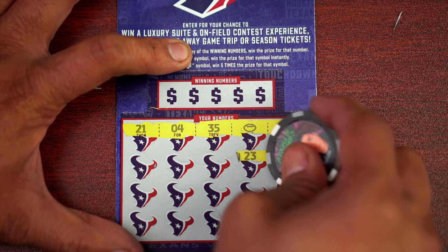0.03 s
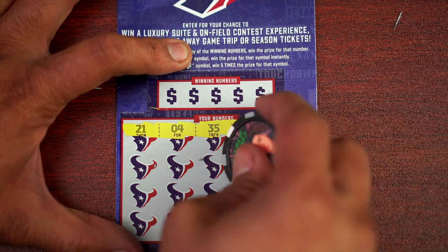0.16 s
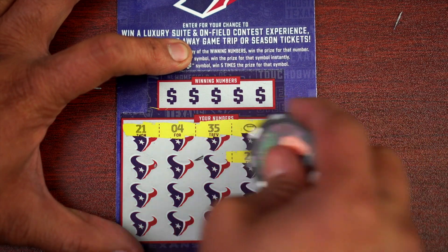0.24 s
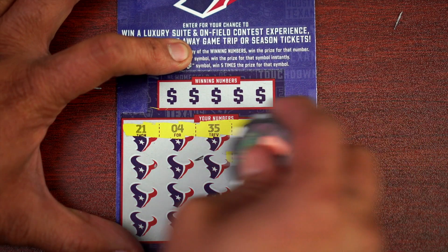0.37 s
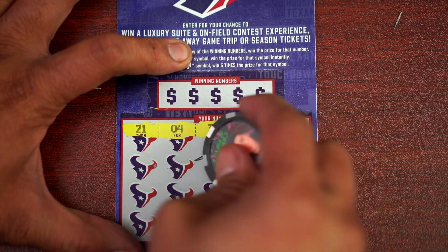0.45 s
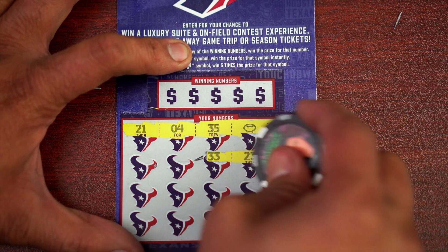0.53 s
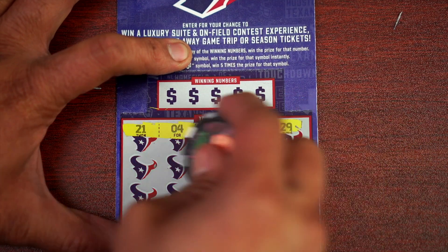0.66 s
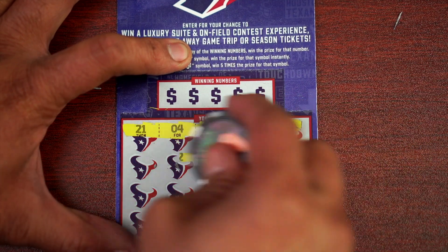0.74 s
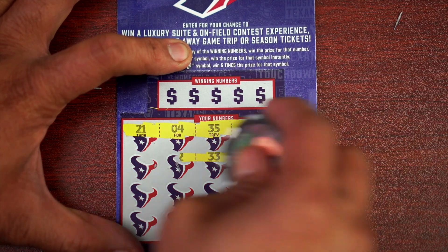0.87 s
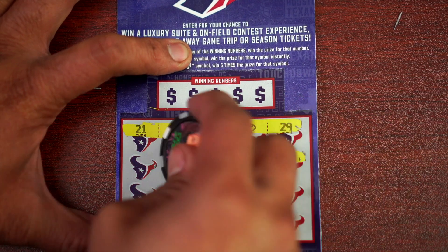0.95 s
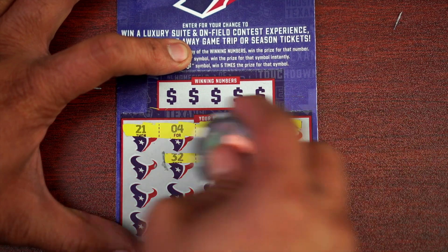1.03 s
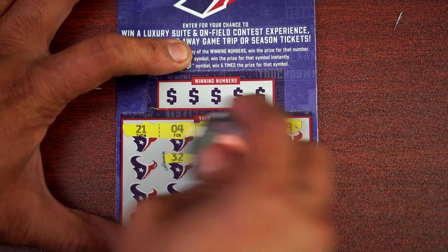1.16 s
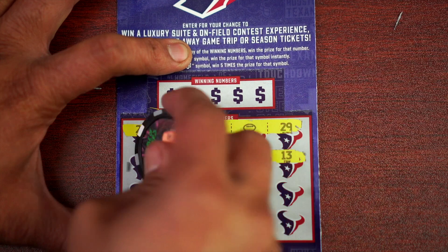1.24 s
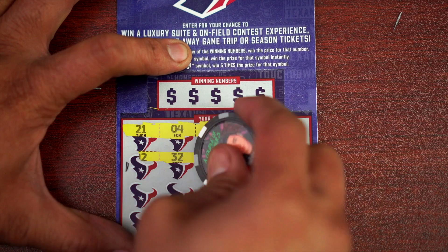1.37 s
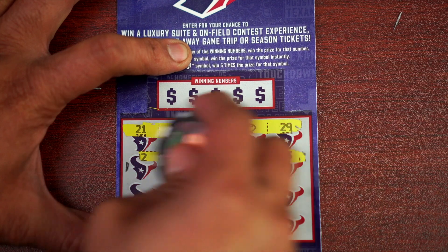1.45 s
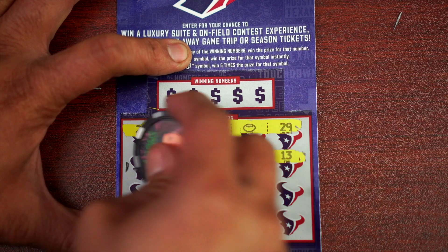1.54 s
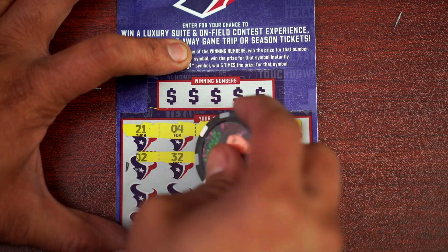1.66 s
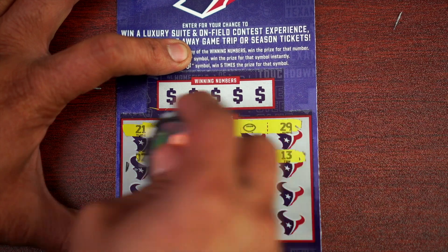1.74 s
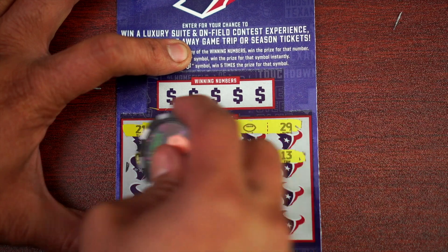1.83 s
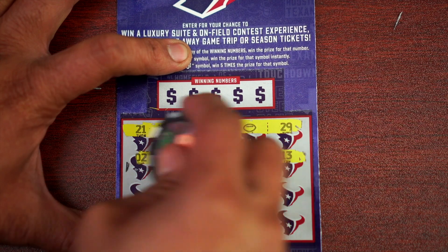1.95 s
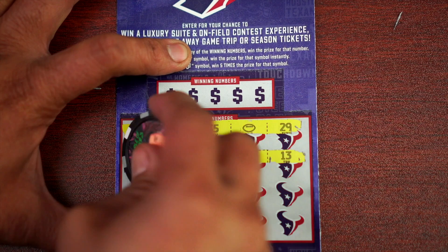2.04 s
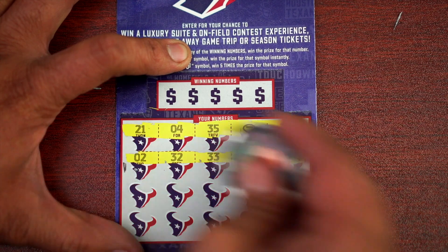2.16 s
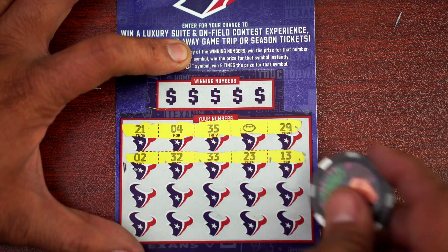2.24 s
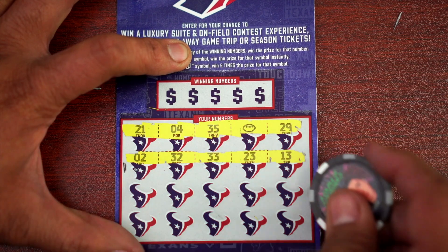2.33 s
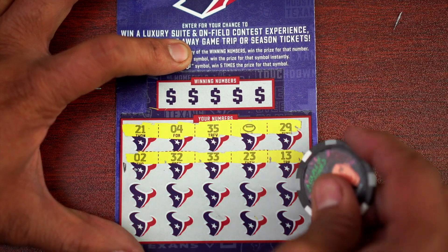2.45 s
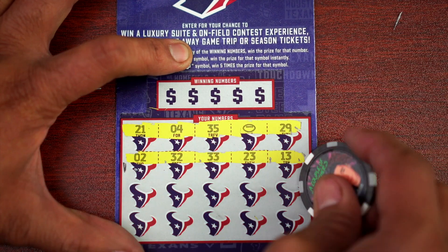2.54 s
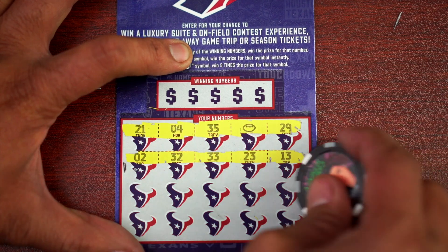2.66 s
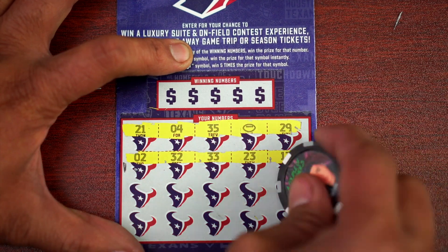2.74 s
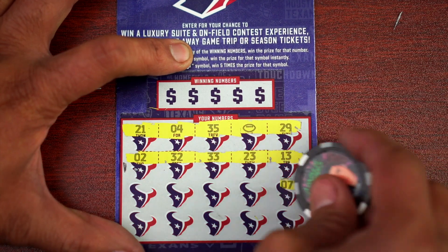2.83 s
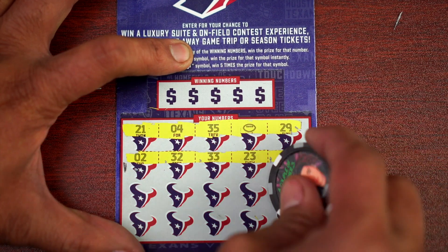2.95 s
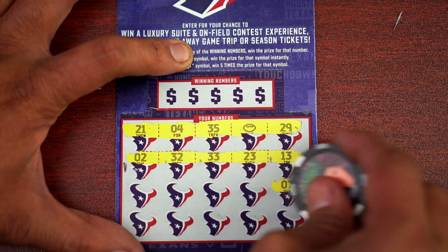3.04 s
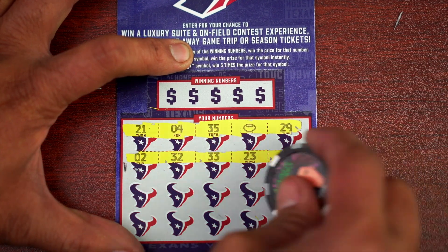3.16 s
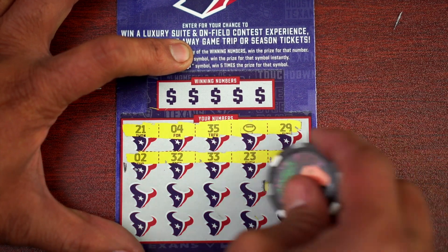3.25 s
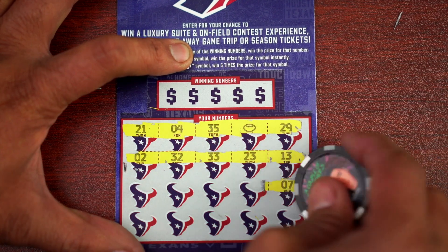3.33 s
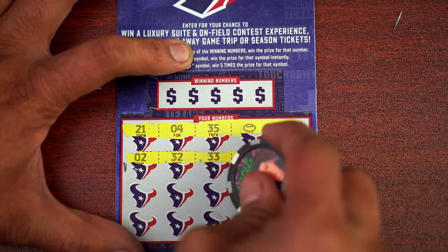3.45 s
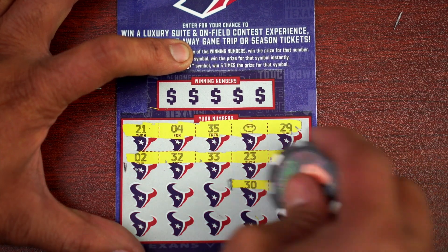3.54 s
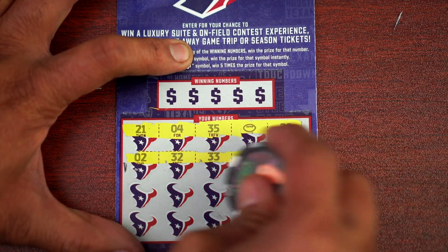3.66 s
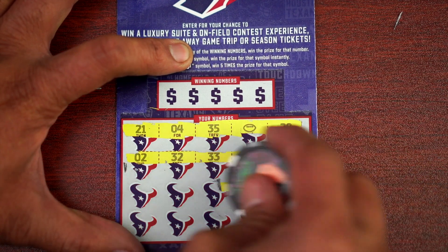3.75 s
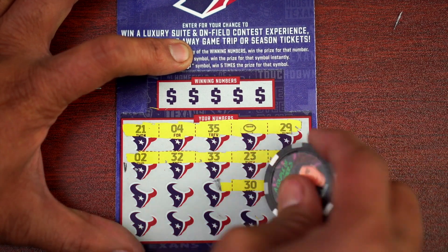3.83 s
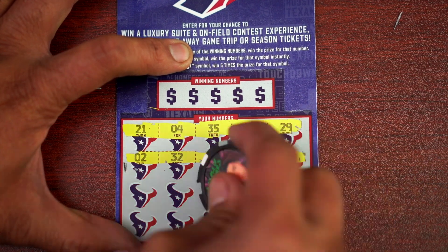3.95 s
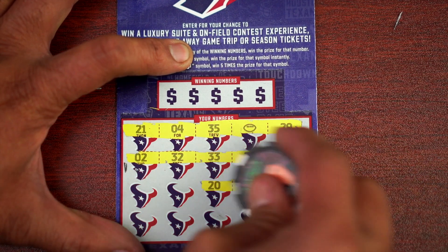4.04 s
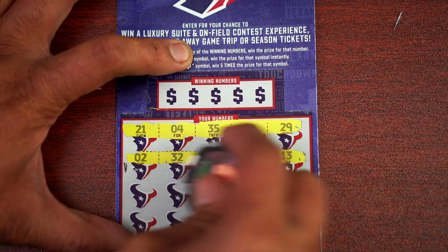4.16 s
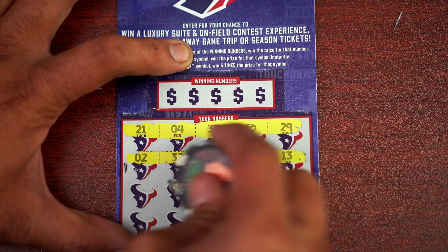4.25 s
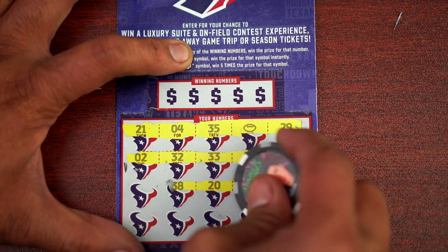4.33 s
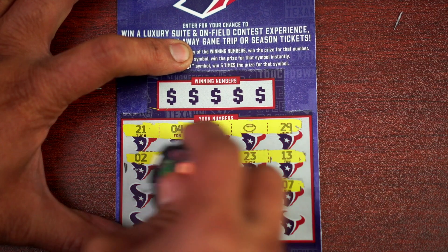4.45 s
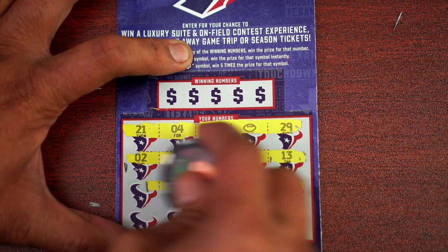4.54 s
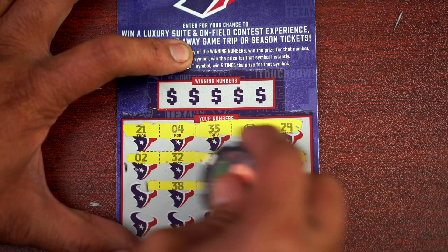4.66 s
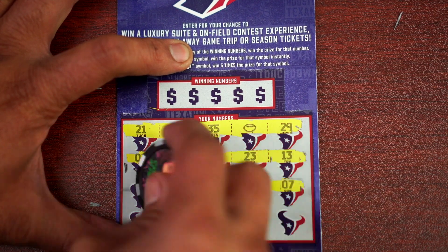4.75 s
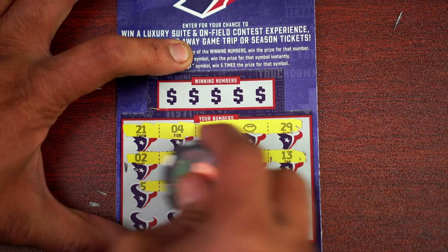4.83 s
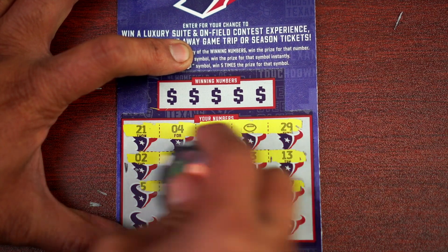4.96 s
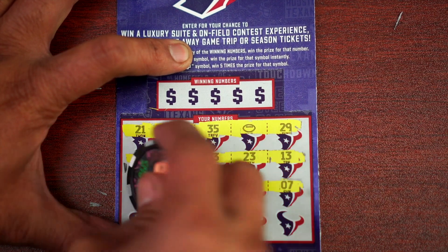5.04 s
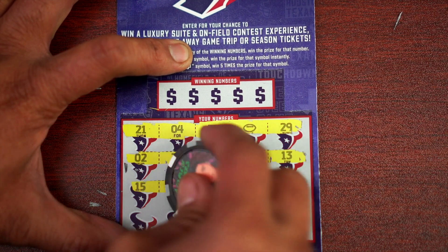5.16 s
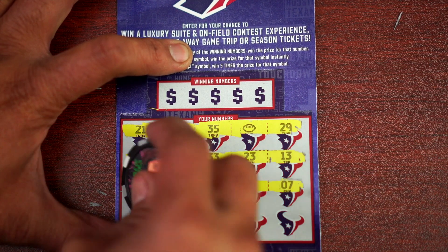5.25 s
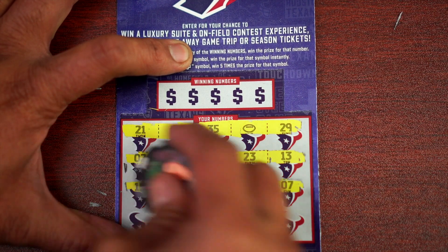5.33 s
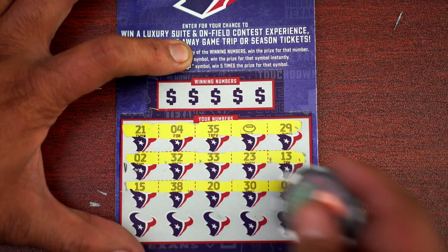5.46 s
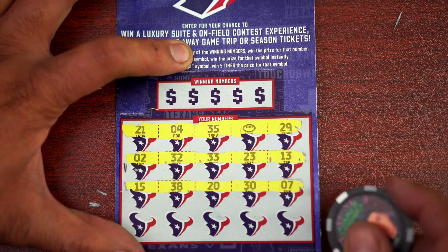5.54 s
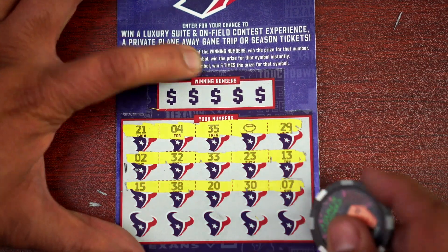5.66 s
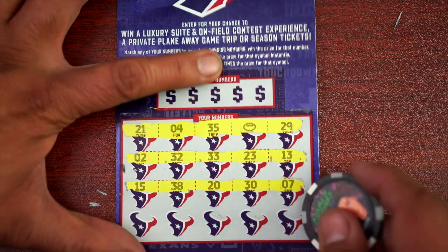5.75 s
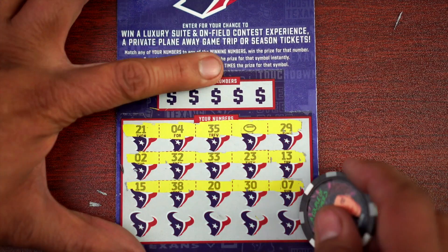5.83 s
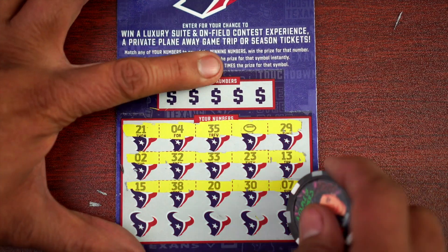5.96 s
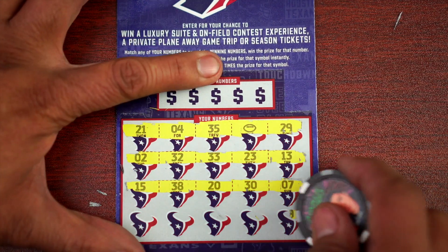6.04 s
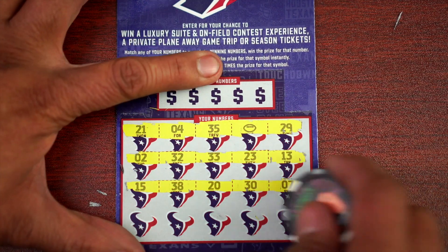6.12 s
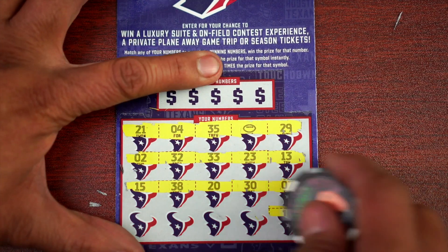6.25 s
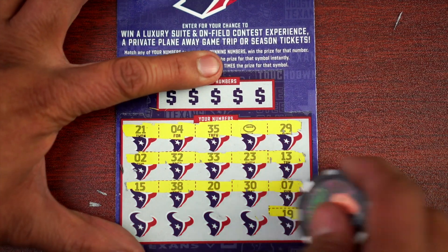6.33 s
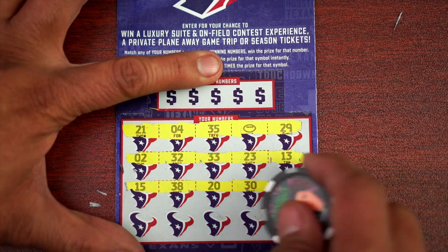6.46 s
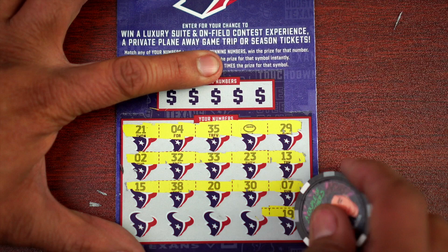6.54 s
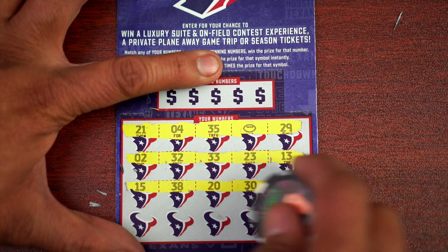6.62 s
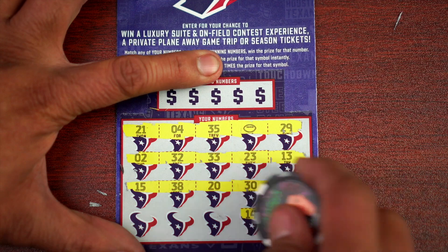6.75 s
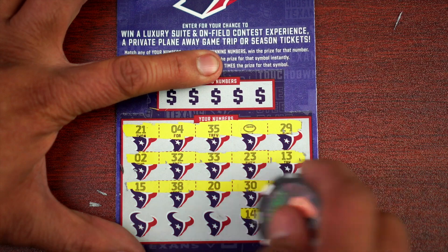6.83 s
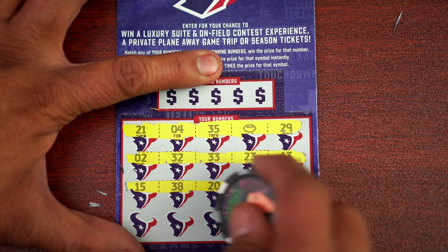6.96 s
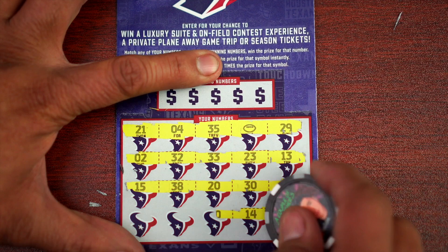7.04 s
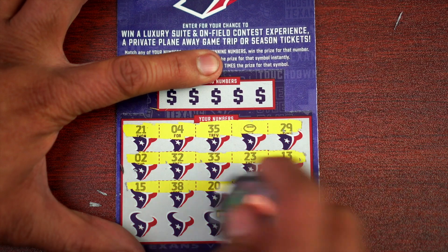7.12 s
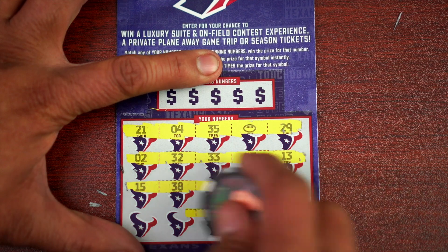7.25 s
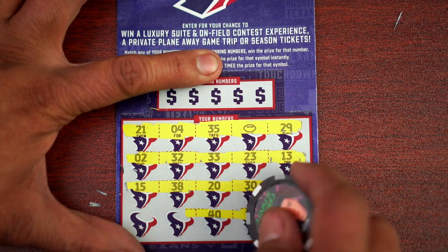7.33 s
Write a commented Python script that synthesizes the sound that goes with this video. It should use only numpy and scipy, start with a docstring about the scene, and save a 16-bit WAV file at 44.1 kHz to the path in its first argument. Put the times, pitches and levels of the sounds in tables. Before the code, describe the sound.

Very close in a small quiet room, a hard plastic disc scratches a coated paper card on a wooden table. Short, separate scrapes come about four a second, each a juddering rub with a dull table knock and gritty rasp. Three runs are divided by two brief rests, where only small ticks, faint rustles and soft skin rubbing remain.

```python
"""A poker chip scratches the latex off a paper lottery ticket on a wooden table, in a small quiet room, close up.
Three rows of ten, eleven and five pushes follow, about four strokes a second, with a short rest after the
first and second. In each push stick-slip jolts judder the chip, drum on the table top and tear off crumbs with
a bright rasp; the way back is a light brush. In the rests chip and holding hand shift with small ticks and
rustles. Skin rubs along the wood and a faint room tone lies underneath throughout."""
import sys
import numpy as np
from scipy import signal
from scipy.fft import rfft, irfft, next_fast_len
from scipy.io import wavfile

SR = 44100
rng = np.random.default_rng(int(sys.argv[2]) if len(sys.argv) > 2 else 0)


def wrap_up_sound(samples):
    """Save the sound to the file named by the first command line argument, as 16-bit audio."""
    columns = np.atleast_2d(samples).T
    # keep every value between -1 and 1, then stretch to whole-number steps
    tamed = np.clip(columns, -1, 1)
    steps = np.round(tamed * 32767).astype(np.int16)
    wavfile.write(sys.argv[1], SR, steps)


N = 325976
TIME = np.arange(N) / SR

# Pushes of the chip, levels ahead of the mix trims: (start [s], length [s], judder [dB],
# edge chatter relative to judder [dB], table drumming [dB], rasp [dB])
PUSHES = [(0.151, 0.066, -46.5, -11.5, -38.5, -65), (0.394, 0.11, -48.5, -10.5, -32.5, -60),
          (0.489, .078, -75.5, -21, -52, -70.5), (0.663, .11, -58.5, 4, -53.5, -53.5),
          (0.922, .12, -45.5, -0.5, -39, -46), (1.189, 0.1, -47, 3.5, -47, -46),
          (1.466, 0.11, -47.5, -28, -45, -62.5), (1.738, 0.13, -46, -24, -37.5, -69.5),
          (1.854, 0.064, -66, -9, -58.5, -67.5), (1.979, 0.15, -70.5, -5.5, -53, -72.5),
          (2.941, 0.092, -74.5, -25, -69.5, -75), (3.16, 0.13, -74, -22, -64.5, -78),
          (3.399, 0.1, -45, -2, -47, -42.5), (3.66, 0.11, -42, -14, -45.5, -49.5),
          (3.91, 0.12, -42, -5, -40.5, -48.5), (4.162, 0.1, -47, -4.5, -37.5, -51),
          (4.421, 0.15, -69, -2, -61, -67.5), (4.718, 0.11, -59, 1.5, -46, -64),
          (4.79, .11, -59.5, -3, -53.5, -71), (4.992, 0.087, -56, -9.5, -49, -67.5),
          (5.239, 0.11, -77.5, -13, -61.5, -79), (6.161, 0.067, -47.5, -17, -40.5, -47.5),
          (6.392, 0.087, -43, -18.5, -46.5, -62), (6.653, 0.066, -67.5, -26, -58.5, -57),
          (6.894, 0.078, -55.5, -17, -56.5, -56.5), (7.156, 0.098, -67.5, -1, -61, -57.5)]
# The edge snags on the coating and slips free: (time [s], level ahead of the rasp trim [dB])
SNAGS = [(0.147, -64), (0.177, -53.5), (0.437, -51.5), (0.449, -59), (1.248, -46), (1.82, -51),
         (2.527, -72), (3.958, -44), (4.776, -73), (4.878, -54.5), (5.778, -80), (5.29, -64.5),
         (6.438, -53)]
# Ticks and rustles as chip and card shift: (time [s], level at the top [dB], pitch [Hz], fall by 20 dB [s])
TICKS = [(0.147, -60, 1780, 0.0027), (2.734, -77.5, 3400, .1), (2.855, -82, 5940, .07),
         (5.458, -79.5, 6540, 0.11), (5.646, -68, 3930, 0.0056), (5.752, -72, 4700, 0.003),
         (5.775, -54, 2600, 0.0042), (5.796, -72.5, 3240, 0.1), (5.884, -73, 456, 0.09)]
# Extra low thumps of the table, mostly on heavy pushes: (time [s], rise and fall by 20 dB [s], level [dB])
THUMPS = [(0.199, 0.054, -36.5), (0.5, 0.051, -38), (1.888, 0.024, -37.5), (4.24, 0.043, -29),
          (4.88, 0.032, -43.5), (5.875, 0.055, -46.5), (6.21, 0.053, -41.5)]
# The hand slides along the table: (time [s], level before its flutter [dB])
HAND_LEVEL = [(0, -70.5), (2.1, -77), (2.3, -95.5), (2.7, -78.5), (3.0, -80.5), (4.7, -73.5), (6.05, -80.5),
              (6.8, -68.5), (7.39, -69.5)]
# The woody answer of the table top varies over time, strongest in the last row:
# (time [s], level relative to drumming [dB])
WOODINESS = [(1.8, -16.5), (3.4, -12), (4.2, -17), (6.3, -8.5)]

# Broad colours, only their shape counts: (frequency [Hz], level per Hz [dB])
# the chip shaking flat on the card
JUDDER_COLOUR = [(200, -10.5), (470, -8.5), (720, -14.5), (850, -15), (930, -6), (1040, -3), (1170, 2),
                 (1300, -2), (1450, -12), (1900, -28.5), (2800, -40)]
# the chip chattering on its tilted edge
EDGE_COLOUR = [(600, -28.5), (1100, -22), (1480, 11), (1800, 4.5), (1980, -6), (2400, -7.5), (2900, -35),
               (4500, -50)]
# the drumming table top
DRUMMING_COLOUR = [(40, -17), (75, 4), (100, 3.5), (145, 0.5), (175, -6), (245, -5), (305, -10.5),
                   (370, -20.5), (700, -27.5), (2500, -86)]
# the woody answer of the table top
WOOD_COLOUR = [(280, -23.5), (430, 0), (600, -5.5), (900, -12.5), (1600, -35.5)]
# the latex tearing off
RASP_COLOUR = [(300, -21.5), (1000, -1), (2200, -7.5), (2900, -7), (3300, -4.5), (3800, 7), (4700, 3),
               (6200, 2.5), (8200, 3), (9600, 0), (12000, -5.5), (14300, -11), (15500, -43)]
# the unloaded chip on the card
BRUSH_COLOUR = [(300, -11.5), (750, -9), (1000, -23), (1400, 5), (1750, -3), (2200, -36), (3300, -10.5),
                (3850, 7), (5500, 0.5), (7500, 2.5), (10000, 0), (15000, -27)]
# skin on wood
HAND_COLOUR = [(30, 2), (110, 7.5), (280, -7), (420, -11.5), (800, -17.5), (1400, -11), (2500, -21.5),
               (6000, -29)]
# the quiet room
ROOM_COLOUR = [(15, 1.5), (34, 1), (55, -1.5), (120, -16), (300, -33), (750, -42.5), (1800, -42.5),
               (2900, -42.5), (4500, -41), (15000, -47)]
# Resonances of the table top with the card on it: (frequency [Hz], width at half lift [Hz], lift [dB])
TABLE_MODES = [(146, 15, 5), (202, 18, 8), (287, 30, 4), (680, 22, 4), (967, 28, 3), (1126, 22, 5),
               (1208, 26, 5), (1321, 24, 4), (1510, 26, 6), (1780, 30, 4), (4720, 120, 4)]

# Timing within a push, as shares of its length; rises, falls and widths reach 20 dB down
PRESS_AT, PRESS_WIDTH = 0.53, 0.47  # hardest pressure
CUT_AT, CUT_RISE, CUT_FALL = 0.52, 0.35, 0.45  # deepest cut into the latex
# Sway of the table: level at mean drumming, and share of the drumming's swing in dB that it follows
SWAY_LAG_S, SWAY_DB, SWAY_FOLLOWS = 0.022, -48, 0.2
# Brush back after a push, if the pause is long enough; level ahead of the mix
RETURN_AFTER_S, RETURN_RISE_S, RETURN_FALL_S, RETURN_DB = 0.051, 0.085, 0.1, -80.5
RETURN_NEEDS_S = 0.11
ROOM_T60_S, ROOM_TONE_DB = 0.46, -64.5
CUTOFF_HZ = 15300


def chip(grip):
    """Coarse slips shake the chip, which breaks loose quickly and glides to a stop; its edge chatters higher."""
    _, _, judder_db, edge_db, *_ = np.array(PUSHES).T
    speed = arcs(judder_db, skew=0.69, taper=1.61, reach=1.12)
    tilted = arcs(judder_db + edge_db, skew=0.82, taper=2.43, reach=1.13)
    judder_force = slips(per_s=1800, spread_db=1.5) * grip * speed
    edge_force = slips(per_s=3000, spread_db=4.0) * grip * tilted
    judder = from_db(0.6) * resonate(judder_force, JUDDER_COLOUR, TABLE_MODES)
    edge = from_db(-0.25) * resonate(edge_force, EDGE_COLOUR, TABLE_MODES)
    return judder + edge


def latex():
    """The coating tears off in thousands of crumbs a second, most in mid-push, with a short crunch at each snag."""
    start, length, *_, rasp_db = np.array(PUSHES).T
    snag_s, snag_db = np.array(SNAGS).T
    cut = swell(start + CUT_AT * length, CUT_RISE * length, CUT_FALL * length, rasp_db)
    uneven_cut = cut * from_db(3.3 * drift(350))
    crunch = swell(snag_s, 0.002, 0.0038, snag_db)
    crumbs = (uneven_cut + crunch) * slips(per_s=16000, spread_db=0.5)
    return from_db(-3.0) * resonate(crumbs, RASP_COLOUR, TABLE_MODES)


def table(grip):
    """Under the hardest pressure the top drums; the whole table sways just after, with some extra low thumps."""
    start, length, _, _, drum_db, _ = np.array(PUSHES).T
    hardest, width = start + PRESS_AT * length, PRESS_WIDTH * length
    force = slips(per_s=1300, spread_db=-1.5) * grip * swell(hardest, width, width, drum_db)
    woody_force = force * from_db(np.interp(TIME, *np.transpose(WOODINESS)))
    drumming = resonate(force, DRUMMING_COLOUR, TABLE_MODES)
    woody = resonate(woody_force, WOOD_COLOUR, TABLE_MODES)

    # a push that drums harder also sways more
    sway_db = SWAY_DB + SWAY_FOLLOWS * (drum_db - drum_db.mean())
    thump_s, thump_width, thump_db = np.array(THUMPS).T
    sway_level = swell(hardest + SWAY_LAG_S, 1.59 * width, 1.83 * width, sway_db)
    sway_level = sway_level + swell(thump_s, thump_width, thump_width, thump_db)
    sway_hz = 34 * (1 + 0.13 * drift(37))
    sway = sway_level * np.sin(2 * np.pi * np.cumsum(sway_hz) / SR)
    return drumming + woody + sway


def brushing():
    """Where a pause leaves it time to come back, the unloaded chip only whispers over the card."""
    start, length, *_ = np.array(PUSHES).T
    end = start + length
    pause = np.append(start[1:], np.inf) - end
    back_s = end[pause > RETURN_NEEDS_S] + RETURN_AFTER_S
    way_back = swell(back_s, RETURN_RISE_S, RETURN_FALL_S, RETURN_DB)
    return resonate(way_back * slips(per_s=5000, spread_db=2.0), BRUSH_COLOUR, TABLE_MODES)


def ticks():
    """The stiff card snaps or rustles: bursts of noise in a band about an octave wide."""
    out = np.zeros(N)
    for time, db, hz, fall in TICKS:
        edges = [hz / np.sqrt(2), min(hz * np.sqrt(2), 0.45 * SR)]
        band = signal.butter(1, edges, "band", fs=SR, output="sos")
        noise = rms_one(signal.sosfilt(band, rng.standard_normal(N)))
        out += noise * swell(time, fall / 10, fall, db)
    return out


def hand():
    """Skin rubs softly along the wood: noise with a fluttering level, coloured by the table."""
    level = from_db(np.interp(TIME, *np.transpose(HAND_LEVEL)) + 2.8 * drift(25))
    return resonate(level * rng.standard_normal(N), HAND_COLOUR, TABLE_MODES)


def reflections(x, t60, treble_loss_hz):
    """Diffuse echoes follow the direct sound and die away by 60 dB in t60 seconds, a little duller."""
    t = TIME[:SR]
    tail = rng.standard_normal(SR) * from_db(-60 * t / t60) * (t > 0.003)
    dull = signal.butter(1, min(treble_loss_hz, 0.45 * SR), fs=SR, output="sos")
    tail = signal.sosfilt(dull, tail)
    return signal.fftconvolve(x, tail / np.sqrt(np.sum(tail ** 2)))[:N]


def room_tone():
    """The quiet room is steady noise, mostly deep bass."""
    return from_db(ROOM_TONE_DB) * resonate(rng.standard_normal(N), ROOM_COLOUR)


def slips(per_s, spread_db):
    """Stick-slip friction: tiny jolts of uneven size and either sign at random moments; rms 1."""
    sizes = from_db(spread_db * np.minimum(rng.exponential(1, N), 4)) * rng.choice([-1, 1], N)
    return rms_one(sizes * (rng.random(N) < per_s / SR))


def arcs(db, skew, taper, reach):
    """One arch of level per push, over reach times its length; a skew under 1 brings the top forward."""
    out = np.zeros(N)
    for (start, length, *_), gain in zip(PUSHES, from_db(db)):
        span = reach * length
        now = slice(*np.searchsorted(TIME, [start, start + span]))
        along = np.clip((TIME[now] - start) / span, 0, 1)
        out[now] += gain * np.abs(np.sin(np.pi * along ** skew)) ** taper
    return out


def swell(s, rise, fall, db):
    """Sum of rounded swells, each 20 dB down one rise before and one fall after its top."""
    out = np.zeros(N)
    for top, up, down, gain in np.broadcast(s, rise, fall, from_db(db)):
        near = slice(*np.searchsorted(TIME, [top - 0.3, top + 0.3]))
        before = (top - TIME[near]) / max(up, 1e-4)
        after = (TIME[near] - top) / max(down, 1e-4)
        out[near] += gain * from_db(-20 * np.abs(np.maximum(before, after)) ** 1.97)
    return out


def drift(rate):
    """A random wander of rms 1, straight lines between rate random points a second."""
    knots = rng.standard_normal(int(rate * N / SR) + 2)
    return rms_one(np.interp(TIME * rate, np.arange(len(knots)), knots))


def resonate(force, colour, modes=()):
    """Causal filter of unit power gain: a broad colour lifted by narrow resonances."""
    size = 2 * next_fast_len(N // 2 + SR // 2)
    hz = np.arange(size // 2 + 1) * SR / size + 1e-3  # keeps the logarithm finite at 0 Hz
    points = np.array(colour)
    db = np.interp(np.log(hz), np.log(points[:, 0]), points[:, 1])
    for centre, width, lift in modes:
        db = db + lift / (1 + (2 * (hz - centre) / width) ** 2)
    # minimum phase by way of the cepstrum: all ringing follows its cause
    cepstrum = irfft(np.log(rms_one(from_db(db))))
    cepstrum[1:size // 2] *= 2
    cepstrum[size // 2 + 1:] = 0
    return irfft(rfft(force, size) * np.exp(rfft(cepstrum)))[:N]


def from_db(db):
    """Decibels to amplitude."""
    return 10 ** (np.asarray(db) / 20)


def rms_one(x):
    """Scale to an rms of 1."""
    return x / np.sqrt(np.mean(x ** 2) + 1e-20)


def scene():
    """Mix the direct sounds with their near and room reflections, the hand and the room tone."""
    grip = from_db(2.0 * drift(130))  # the edge catches and lets go many times in a stroke
    body = chip(grip) + table(grip)
    surface = latex() + brushing() + ticks()
    near = reflections(from_db(-10.0) * body + from_db(-6.5) * surface, t60=0.048, treble_loss_hz=12300)
    room = reflections(from_db(-32.0) * body + from_db(-26.0) * surface, t60=ROOM_T60_S, treble_loss_hz=7000)
    return (body + surface + hand() + near + room + room_tone())[None]


def record(dry):
    """A steep low-pass cuts off the top of the treble."""
    return signal.sosfilt(signal.ellip(10, 0.2, 80, CUTOFF_HZ, fs=SR, output="sos"), dry)


dry = scene()
out = record(dry)
wrap_up_sound(out)
```